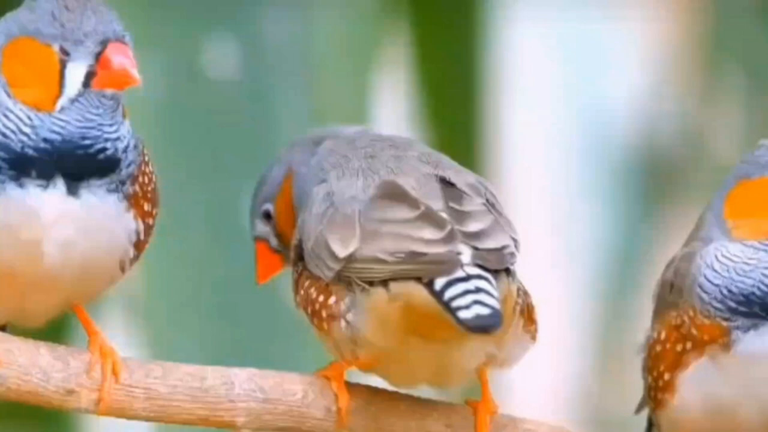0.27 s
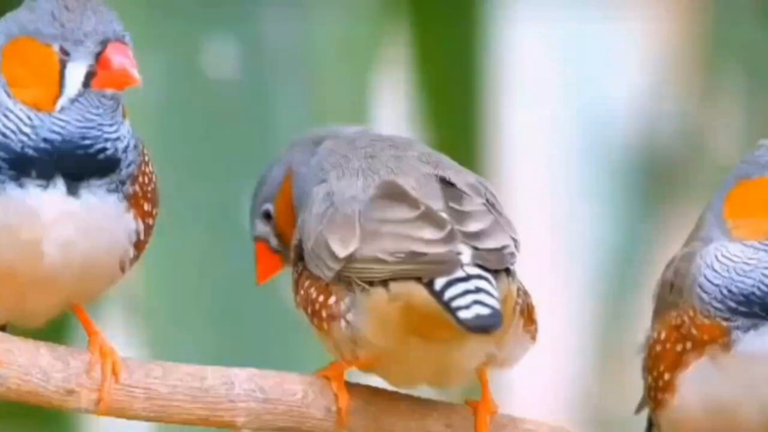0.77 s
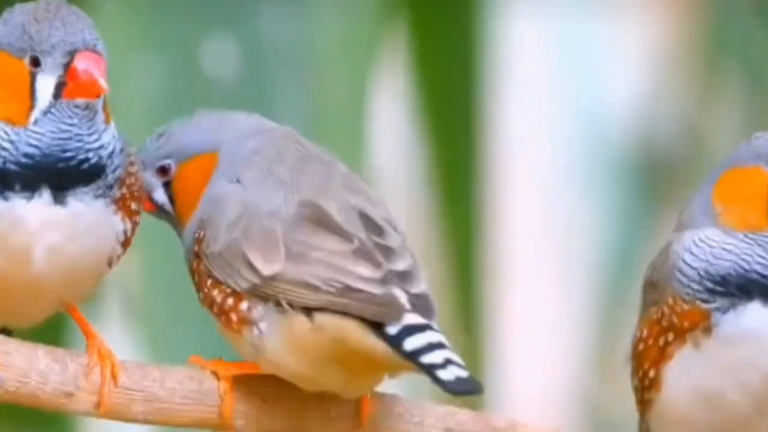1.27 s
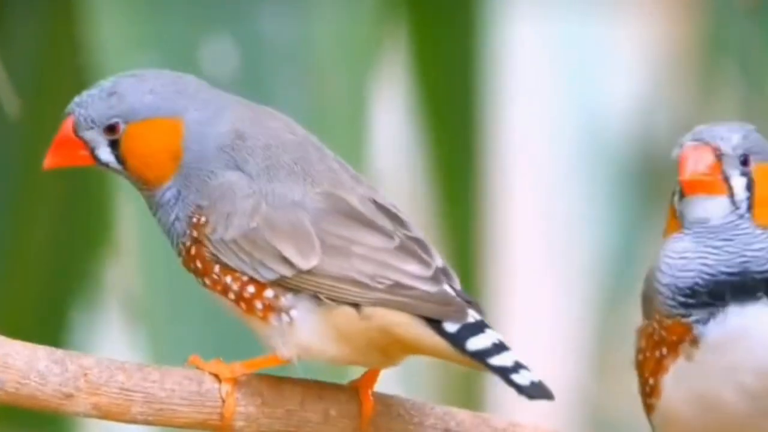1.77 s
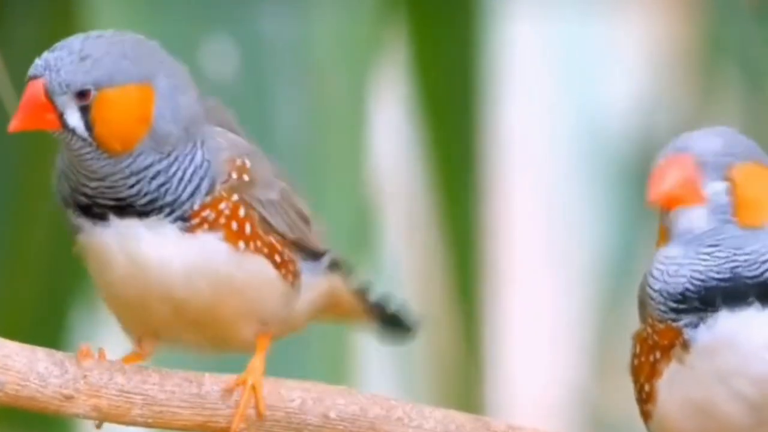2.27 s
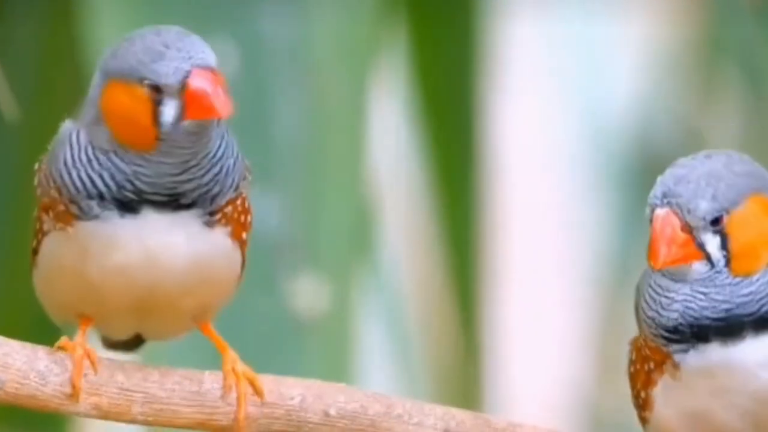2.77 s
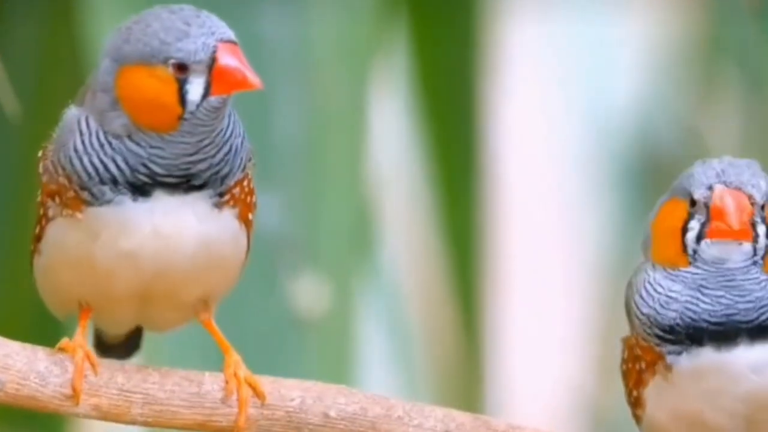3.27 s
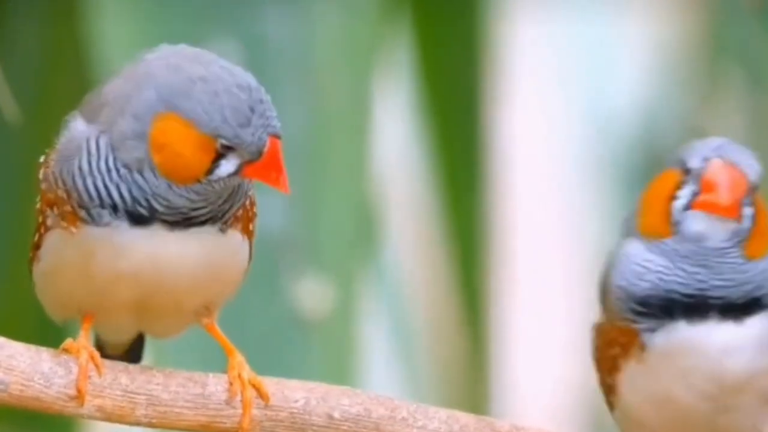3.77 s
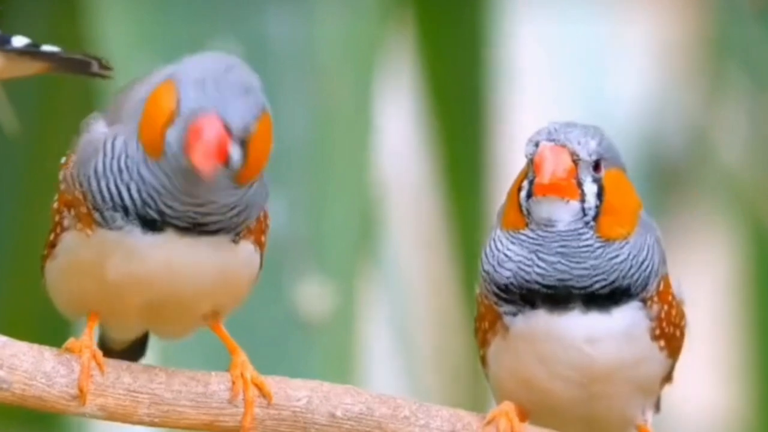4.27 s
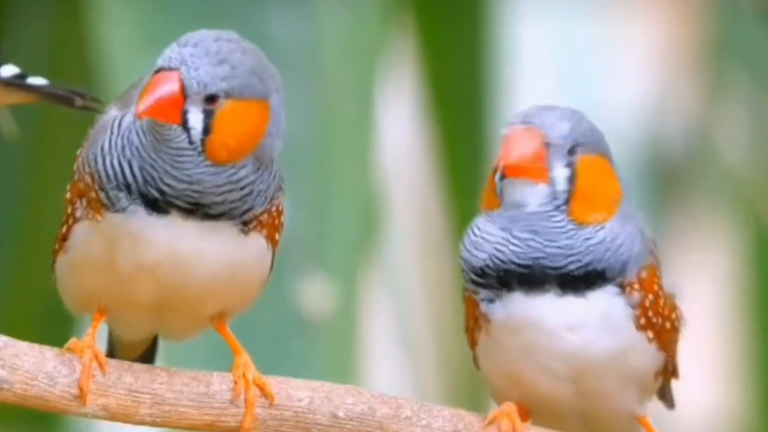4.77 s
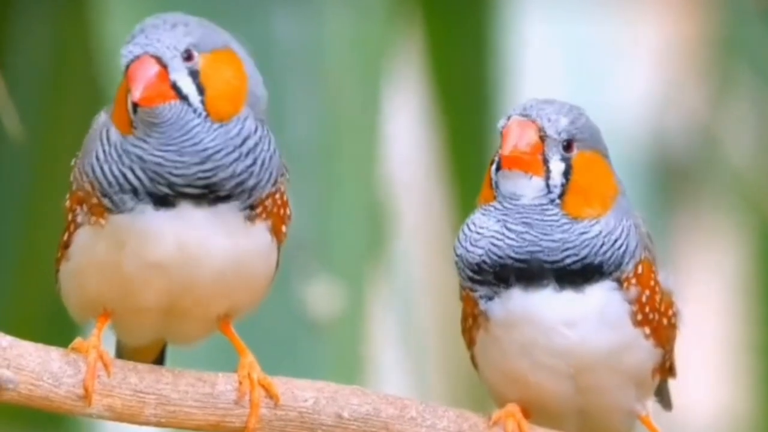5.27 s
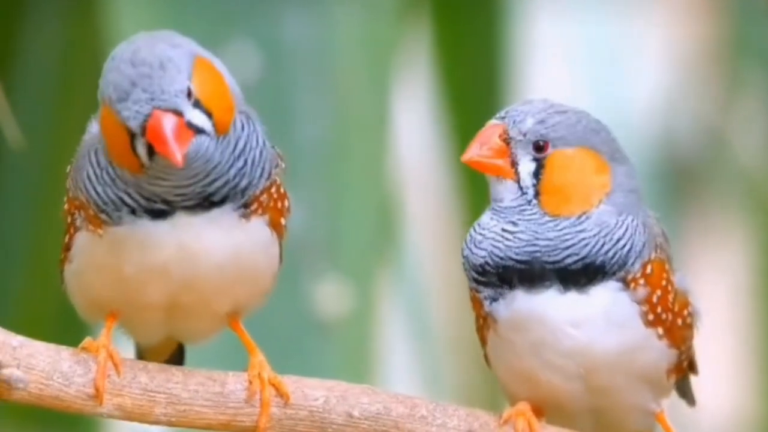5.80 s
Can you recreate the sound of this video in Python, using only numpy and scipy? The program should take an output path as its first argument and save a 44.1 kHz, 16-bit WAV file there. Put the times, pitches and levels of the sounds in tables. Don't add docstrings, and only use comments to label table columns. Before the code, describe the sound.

A close pickup in a small-finch aviary, with faint hiss, low machine hum, a thin high insect tone and barely audible distant chirps. The first second is nearly quiet. Short nasal, buzzy beeps, each under a tenth of a second, then come at about 1.3, 1.8, 2.4, 2.7, 3.3, 3.9, 4.7, 4.9, 5.4, 5.7 and very softly 5.9 seconds, from near birds with slightly different voices. A faint whistle sounds at 1.3 and a blurred moan at 2.2. Wings flutter with crisp snaps around 2.4 to 2.5, feathers and claws rustle until 3.2, and a short duller thump of movement lands at 4.1. Farther birds give a hoarse rasp and level drawl from 3.2 to 3.8, a falling whine at 4.2, then soft pleading notes rising into a loud wavering squeal and warble from 4.6 to 4.9. Faint piping and shaken notes follow around 5.3 to 5.6, with light echo.

```python
import sys
import numpy as np
from scipy import signal
from scipy.fft import rfft, irfft
from scipy.io import wavfile
from scipy.ndimage import uniform_filter1d

SR = 44100
rng = np.random.default_rng(int(sys.argv[2]) if len(sys.argv) > 2 else 0)


def ratio(d):
    e = np.asarray(d, float) / 20
    return 10 ** e


def unload_audio(sound):
    columns = np.transpose(np.atleast_2d(sound))
    steps = np.round(np.clip(columns, -1, 1) * 32767)
    wavfile.write(sys.argv[1], SR, steps.astype(np.int16))


N = 266275

# frequency in Hz, level in dB.
HISS_SPECTRUM = [(18, -59), (30, -5), (69, -10.5), (182, -8.5), (308, -11), (370, -12.5), (1520, -21.5),
                 (1920, -25.5), (7490, -26.5), (8990, -47), (15600, -28)]
HISS_DB = -69
# frequency in Hz, level in dB, width in Hz.
HUM_LINES = [(34.6, -9.5, 23), (68.4, -8, 24), (94, -4.5, 22), (186.2, -5, 18), (338, -24, 5.9)]
HUM_DB, RUMBLE_DB = -78, -76
# centre in seconds, level in dB, spread in seconds.
HUM_SWELLS = [(.8, -73.5, 0.14), (1.75, -73, 0.27), (3.04, -77, 0.14), (3.55, -70, 0.046),
              (3.85, -74, 0.14), (4.42, -68, 0.035)]
# centre in seconds, level in dB, spread in seconds.
HUM_SURGES = [(.65, -67, 0.054), (5.78, -60, 0.036), (5.94, -60, 0.027)]
# frequency in Hz, level in dB, width in Hz, throbs per second.
INSECT = (7550, -76, 280., 8.6)
# frequency in Hz, t60 in seconds.
AVIARY_T60 = [(1000, 0.17), (2600, 0.24), (7000, 0.069), (15000, 0.27)]
CHATTER_COUNT, CHATTER_MAX_DB = 150, -76
# start in seconds, #
# frequency in Hz, level in dB, width in Hz, length in seconds.
FAINT_TONES = [(0.49, 1238, -68, 80., 0.064), (0.501, 1830, -73, 100., 0.037), (0.595, 751, -70, 80., 0.08),
               (1.3, 2300, -52, 70., 0.11), (1.33, 2290, -60, 50., 0.14), (1.33, 2850, -62, 120., 0.08),
               (1.33, 3450, -63, 120., 0.07), (1.32, 511, -72, 60., 0.11), (1.4, 1136, -69, 100., 0.16),
               (1.713, 4720, -68, 300., 0.05), (1.88, 3200, -62, 900., 0.08), (1.93, 3600, -65, 900., 0.11),
               (2.325, 4820, -68, 150., 0.11), (2.55, 500, -75, 60., 0.073),
               (2.865, 1150, -64, 200., 0.025), (2.99, 700, -69, 150., 0.06),
               (3.025, 2740, -64, 90., 0.045), (3.065, 680, -67, 150., 0.075),
               (3.497, 525, -65, 80., 0.049), (3.77, 1930, -66, 500., 0.16), (3.78, 3060, -66, 650., 0.15),
               (3.77, 4430, -68, 550., 0.16), (4.116, 1195, -58, 80., 0.046),
               (4.306, 3620, -56, 60., 0.025), (4.32, 1990, -63, 100., 0.085),
               (4.35, 3150, -57, 1000., 0.14), (4.381, 1370, -70, 80., 0.096),
               (5.51, 1450, -69, 60., 0.038), (3.46, 7400, -62, 350., 0.18), (3.69, 5300, -69, 100., 0.11),
               (4.785, 5920, -58, 90., 0.055), (5.77, 2400, -58, 100., 0.11), (5.77, 2920, -58, 100., 0.09),
               (5.16, 3450, -71, 150., 0.12), (5.42, 4650, -65, 150., 0.09), (5.54, 5150, -70, 150., 0.055),
               (2.54, 1900, -70, 400., 0.16), (5.947, 705, -66, 60., 0.13)]

# time in seconds, peak in dB, t60 in seconds, dullness 0-1, first snap in dB.
RUSTLES = [(1.723, -56.5, 0.2, 0.05, 10), (1.805, -49, 0.48, 0.67, -6), (2.079, -54.5, 0.58, 0, 5),
           (2.3914, -47.5, 0.48, 0, -29), (2.4164, -40, 0.14, 0.65, 6.5), (2.428, -36.5, 0.2, 0.8, -6),
           (2.456, -40.5, 0.29, 0, -35.5), (2.485, -54.5, 0.061, 0, 30.5), (2.5002, -36, 0.059, 0, 4),
           (2.695, -53.5, 0.48, 0, 3), (2.7222, -47.5, 0.58, 1, -19), (2.8687, -47, 0.45, 0.5, 5),
           (2.8845, -50.5, 0.19, 0.6, -1), (2.9047, -47.5, 0.317, 0.2, 3), (2.9447, -46, 0.19, 0.05, 2),
           (2.972, -49.5, 0.17, 0, 6), (2.988, -43.5, 0.23, 0, -5), (3.0165, -57.5, 0.14, 0, 0.5),
           (3.033, -54, 0.17, 0, -1), (3.0736, -53.5, 0.34, 0, -10), (3.109, -57.5, 0.095, 0, 15.5),
           (3.156, -47.5, 0.39, 0.35, -27), (3.19, -34, 0.079, 0.37, -18), (4.1215, -33.5, 0.13, 0.46, -15),
           (4.136, -28, 0.085, 0.66, -42)]
# time in seconds, peak in dB.
SNAPS = [(2.4294, -34.5), (2.4829, -33.5), (2.6949, -57), (2.904, -45.5), (2.9442, -53), (2.9728, -39.5),
         (3.0167, -44), (3.0756, -43), (3.1549, -46), (3.1908, -44.5)]
# frequency in Hz, level in dB.
FEATHERS = [(350, -22), (600, -21.5), (1500, -8.5), (2400, -10), (4200, -11), (5700, -9), (7800, -9),
            (9300, -3.5), (12000, -4), (15500, -5)]
# frequency in Hz, level in dB.
FEET = [(350, -54.5), (600, -66.5), (1190, -12.5), (1870, -6.5), (4180, 2), (6230, -9.5), (8000, -41),
        (10400, -36.5), (17600, -120)]
STIR_DB = -73.5
# centre
# in seconds, level in dB, spread in seconds.
STIR_BOUTS = [(1.5, -74, 0.173), (2.55, -73, 0.058), (3.0, -70, 0.06), (3.5, -72.5, 0.099),
              (4.0, -81, 0.71), (4.83, -63, 0.1)]

# start in seconds, length in seconds, first and last pitch in Hz, peak in dB.
PEEPS = [(2.135, 0.094, 1836, 1945, -61), (2.33, 0.11, 2240, 2130, -61), (5.26, 0.16, 2485, 2510, -67.5),
         (5.8, 0.15, 4900, 4960, -67), (5.8, 0.23, 3950, 3990, -69.5)]
CHURRS = [(3.2, 0.114, 2876, 2650, -61.5)]
RATTLES = [(5.48, 0.108, 2950, 3300, -57.5), (5.44, 0.16, 2450, 2800, -68.5),
           (5.44, 0.13, 3800, 3500, -67.5), (5.43, 0.09, 2750, 2200, -68)]
# loudest place 0-1, loss at start and at end in dB, partials (multiple, level in dB),
# blur in Hz, breath in dB.
PEEP = (0.31, 33, 12, [(1, -3.5)], 150, -37)
CHURR = (0.15, 2.2, 5.8, [(0.996, 3.5), (0.78, 0), (0.81, -0.5)], 187, -0.5)
RATTLE = (0.89, 8.8, 2.9, [(1, 2), (1.1, -9.5)], 350, -18.5)
RATTLE_HZ, RATTLE_DEPTH = 68, 0.3

# frequency in Hz, level in dB.
BREATH = [(900, -25.5), (1800, -13.5), (2800, 1), (4500, 1), (6500, -6.5), (8000, -11), (11000, -19.5)]
# time in seconds, strongest partial in Hz, its level in dB.
RASP = [(3.23, 3620, -60), (3.3, 3600, -59.5), (3.37, 3690, -54), (3.602, 3668, -54), (3.73, 3840, -75)]
DRAWL = [(3.42, 2598, -55), (3.46, 2604, -48.5), (3.5, 2619, -48), (3.56, 2567, -50.5), (3.65, 2590, -56.5),
         (3.752, 2600, -66.5), (3.79, 2580, -79)]
WHINE = [(4.15, 2524, -55), (4.18, 2370, -60), (4.23, 2265, -59), (4.31, 2168, -75.5), (4.36, 2360, -58)]
PLEA = [(4.36, 2273, -74), (4.44, 2383, -56.5), (4.478, 2380, -57.5), (4.55, 2376, -61), (4.6, 2306, -57),
        (4.625, 2246, -63), (4.65, 2170, -75)]
SQUEAL = [(4.61, 2187, -39), (4.625, 2307, -48.5), (4.645, 2476, -42), (4.7, 2512, -49.5),
          (4.76, 2518, -56.5), (4.79, 2445, -40), (4.86, 2399, -42.5), (4.906, 2327, -53),
          (4.925, 2350, -47)]
MOAN = [(2.15, 2620, -68), (2.18, 2790, -63.5), (2.22, 2856, -64.5), (2.26, 2870, -75), (2.295, 2914, -60),
        (2.36, 2757, -67), (2.43, 2620, -63)]
PIPING = [(5.17, 3720, -90), (5.21, 3910, -75.5), (5.252, 3900, -58.5), (5.295, 3870, -72),
          (5.33, 3570, -70), (5.36, 3350, -60)]
WARBLE = [(4.645, 3000, -61.5), (4.66, 3065, -46.5), (4.692, 3012, -33.5), (4.705, 3160, -43),
          (4.718, 3110, -35), (4.795, 3007, -36), (4.83, 2940, -46.5), (4.87, 2882, -50)]
REPLY = [(4.39, 3450, -66), (4.43, 3580, -55), (4.5, 3618, -56), (4.58, 3570, -56.5), (4.63, 3560, -68.5),
         (4.72, 3560, -68)]
WARBLE_END = [(4.8, 2520, -62), (4.83, 2297, -58.5), (4.85, 2155, -46.5), (4.872, 2042, -52.5),
              (4.93, 2024, -55)]
# contour, partials (multiple, level in dB), blur in Hz, breath in dB.
LONG_CALLS = [
    (RASP, [(1, 3), (.5, -22), (2, -12), (1.5, -11), (1.2, -12), (.84, -13)], 150, -2),
    (DRAWL, [(1, 0), (2, -12)], 95, -7),
    (WHINE, [(1, 6), (2, -6), (1.25, -2.5)], 123, -7),
    (PLEA, [(1, 2.5), (.5, -23), (2, 2), (2.5, -11)], 138, -15),
    (REPLY, [(1, -2.5)], 170, -22),
    (SQUEAL, [(1, 2), (2, -2), (3, -11.5), (4, -14.5), (5, -22.5), (.92, -10), (2.8, -16.5)], 136, -31),
    (WARBLE, [(1, -1), (2, -24.5), (3, -30)], 116, -21),
    (WARBLE_END, [(1, 6.5), (1.5, -28)], 82, -14),
    (PIPING, [(1, 0.5)], 70, -23),
    (MOAN, [(1, 0.5), (1.5, -17)], 320, -13.5),
]

# frequency in Hz, level in dB.
THROAT = [(530, -53.5), (900, -40.5), (1200, -16.5), (1630, -20), (2310, -11), (2930, -8), (3460, -3.5),
          (4180, -1), (4820, -2.5), (5440, -9.5), (5840, -14), (7770, -42), (8750, -29), (12200, -37),
          (15500, -35)]
# frequency in Hz, depth 0-1, width in Hz.
THROAT_DIPS = [(2936, 0.76, 21), (4775, 1, 38), (5290, 0.52, 110)]
BEAK_HZ, BEAK_WIDTH_HZ = 4650, 1200
FRAY_HZ = 230
# start in seconds, length in seconds, peak in dB, mid-call sag of effort
# in dB, beak towards the microphone in dB.
NEAR_CALLS = [(2.725, 0.077, -31, -7, -4.5), (3.302, 0.086, -27, -3.5, -4), (3.902, 0.094, -27.5, 0, 1),
              (4.902, 0.0828, -28.5, -2.5, -10), (5.683, 0.087, -30.5, -4.5, -1)]
NEAR_TINTS = [
    [0.2, 1, -2, -0.83, .1, .1, .1],
    [-1.8, 1.2, -2.5, -0.5, .1, .1, .1],
    [-0.3, -2.8, 1.1, 0.7, .1, .1, .1],
    [-1.5, 2.5, -2.1, -3, .1, .1, .1],
    [-2.1, -0.5, 1.5, -2.5, .1, .1, .1],
]
NEAR_HZ, NEAR_HZ_PER_DB = 592.7, 0.5
NEAR_BEND = .11
SAG_PLACE, PUSH_PLACE, PUSH_SHARE = 0.39, 0.58, 0.51
# start in seconds, peak in dB, top pitch in Hz, share of pitch lost at the ends,
# beak towards the microphone in dB.
BRISK_CALLS = [(1.276, -33.5, 576.4, 0.15, -3.5)]
FAR_CALLS = [(1.03, -65, 541.4, 0.068, 0.092)]
DULL_CALLS = [(1.822, -38.5, 546, .22, .1)]
DEEP_CALLS = [(2.413, -34, 560, .26, .1)]
BRIGHT_CALLS = [(4.737, -33.5, 562.3, 0.2, 0.45)]
SHY_CALLS = [(5.946, -42.5, 551.2, 0.08, 4.9)]
CLEAR_CALLS = [(5.356, -39, 547.7, 0.15, 0.34)]
BRISK_S, FAR_S, DULL_S, DEEP_S, BRIGHT_S, SHY_S = 0.066, 0.061, 0.068, 0.075, .071, 0.067
# effort (place 0-1, level in dB), harmonics 2, 3, .. in dB, place of the top pitch 0-1,
# hoarse share 0-1, last fall against first rise, echo in dB.
NEAR_VOICE = ([(0, -20), (.07, -16.5), (.15, -3.5), (.74, 1.62), (.85, 1), (1, -16)],
              [-15, -21, -5.5, -4.5, 0, 2.5, -7.5, -10, -30.5, -29], 0.428, 0.43, 0.808, -1.46)
BRISK_VOICE = ([(0, -38), (.17, -13), (.36, -8), (.5, -10), (.64, 3), (.78, -6.5), (1, -31)],
               [-11, -16.5, -4, -11.5, -5, -4, -14.5, -17, -30, -29], 0.5, 0.6, 1.2, -2)
FAR_VOICE = ([(0, -23), (.18, 4), (.69, 7.5), (1, -46)], [-4, -7, 2, 12, 4, -6, -34, -36, -40, -36],
             0.58, 0.91, 1.1, -2)
DULL_VOICE = ([(0, -28), (.14, -7.5), (.45, 1.5), (.72, -1.5), (.86, -7), (1, -30)],
              [-8.5, -13.5, -5, 0.5, -2.5, -2, -19.5, -23, -17, -27], .54, 0.4, 0.92, -6)
DEEP_VOICE = ([(0, -22), (.18, -8), (.62, 1), (.82, -3), (1, -22)],
              [-10, -8, -4, 3, -3, -5, -10, -24, -24, -26], .56, .7, 1.05, -6.5)
BRIGHT_VOICE = ([(0, -18), (.22, -2), (.58, 1.5), (.8, -3.5), (1, -20)],
                [-18, -19.5, -18, -3.5, -6, -4.5, -7.5, -26, -19, -22], 0.458, 0.73, 1.2, -4)
SHY_VOICE = ([(0, -20), (.21, -2), (.57, 2.5), (.81, -6), (1, -24)],
             [-21.5, -19, -12, -2.5, -7, -3.5, -13, -22, -9.5, -18.5], 0.44, 0.69, 0.68, -1.5)
CLEAR_VOICE = ([(0, -20), (.2, -4), (.56, 2), (.82, -4.5), (1, -17)],
               [-17.5, -16.5, -14, -2.5, -5.5, -7, -6, -25, -14, -18], 0.523, 0.83, 0.85, -1)


def evened(x):
    return x / np.sqrt(np.mean(abs(x) ** 2) + 1e-20)


def read(points, hz):
    f, value = np.transpose(points)
    return np.interp(np.log(hz + 1), np.log(f + 1), value)


def add(mix, start_s, sound):
    part = mix[round(start_s * SR):][:len(sound)]
    part += sound[:len(part)]


def coloured(points, size=N):
    hz = np.fft.rfftfreq(size, 1 / SR)
    spectrum = rfft(rng.standard_normal(size))
    return evened(irfft(spectrum * ratio(read(points, hz)), size))


def wobble(width_hz, size=N):
    pole = np.exp(-np.pi * 1.5 * width_hz / SR)
    z = rng.standard_normal((size + 4000, 2)) @ [1, 1j]
    return evened(signal.lfilter([1], np.poly([pole] * 3), z)[4000:])


def blurred_tone(hz, width_hz, size=N):
    t = np.arange(size) / SR
    return (wobble(width_hz, size) * np.exp(2j * np.pi * hz * t)).real


def unrolled(rows):
    s, *columns = np.transpose(rows)
    t = np.arange(s[0], s[-1], 1 / SR)
    return s[0], [uniform_filter1d(np.interp(t, s, c), 200, mode="nearest") for c in columns]


def bouts(rest_db, rows):
    t = np.arange(N) / SR
    bells = [ratio(db) * np.exp(-.5 * ((t - s) / spread_s) ** 2) for s, db, spread_s in rows]
    return ratio(rest_db) + sum(bells)


def arch(u, place, lost_start, lost_end):
    rise = lost_start * (1 - u / place) ** 2
    fall = lost_end * ((u - place) / (1 - place)) ** 2
    return np.where(u < place, rise, fall)


def hiss():
    hz, _, z = signal.stft(coloured(HISS_SPECTRUM), SR, nperseg=1024)
    patches = uniform_filter1d(rng.standard_normal(z.shape), 3, 0)
    patches = evened(uniform_filter1d(patches, 5, 1))
    patchy_db = np.interp(hz, [0, 1500, 8000], [3., 2.5, 1.5])[:, None] * patches
    noise = signal.istft(z * ratio(patchy_db), SR, nperseg=1024)[1][:N]
    return ratio(HISS_DB - 4.0) * evened(noise)


def hum():
    swell, surge = bouts(HUM_DB, HUM_SWELLS), bouts(-120, HUM_SURGES)
    out = np.zeros(N)
    for hz, db, width_hz in HUM_LINES:
        level = ratio(RUMBLE_DB)
        if hz > 80:
            level = swell + (hz > 150) * surge
        out += level * ratio(db) * blurred_tone(hz, width_hz)
    return out


def insect():
    hz, db, width_hz, throb_hz = INSECT
    t = np.arange(N) / SR
    throb = np.sin(2 * np.pi * throb_hz * t + 1.3 * wobble(2.5).real)
    throb = np.maximum(throb, .45) ** 2 * (.55 + .45 * abs(wobble(1.5)))
    return ratio(db) * throb * blurred_tone(hz, width_hz)


def aviary(x):
    taps = np.zeros(SR // 2)
    at = np.arange(400, len(taps) - 20, 20)
    taps[at + rng.integers(0, 20, len(at))] = rng.choice([-1., 1.], len(at))
    hz, t, z = signal.stft(taps, SR, nperseg=256)
    decay_db = -60 * t / read(AVIARY_T60, hz)[:, None]
    tail = signal.istft(z * ratio(decay_db), SR, nperseg=256)[1]
    return signal.fftconvolve(x, tail / np.linalg.norm(tail))[:N]


def faint(start_s, hz, db, width_hz, length_s):
    size = round(length_s * SR)
    return start_s, ratio(db) * np.hanning(size) * blurred_tone(hz, width_hz, size)


def chatter():
    out = np.zeros(N)
    for a, b, c, d in rng.random((CHATTER_COUNT, 4)):
        add(out, *faint(a * N / SR, 1500 + 7000 * b, CHATTER_MAX_DB - 6 * c, 90., .04 + .1 * d))
    return out


def rustles():
    bright, dull = coloured(FEATHERS), coloured(FEET)
    puffs, snaps, t = np.zeros(N), np.zeros(N), np.arange(12000) / SR
    for s, db, t60_s, dullness, snap_db in RUSTLES:
        at = round(s * SR)
        attack = np.sin(np.pi / 2 * np.minimum(t / .012, 1)) ** 2
        shape = ratio(db - 8 - 60 * t / t60_s) * attack
        shape = shape * (1 + ratio(snap_db - 60 * abs(t - .008) / 0.0044))
        add(puffs, s - .006, shape * (bright[at:at + len(t)] + dullness * dull[at:at + len(t)]))
    for s, db in SNAPS:
        add(snaps, s, ratio(db - 5 - 60 * t[:600] / .011) * bright[round(s * SR):][:600])
    grain = ratio(3. * wobble(150.).real - 1.)
    flicker = ratio(1.5 + 2.2 * wobble(40.).real)
    stir = bouts(STIR_DB, STIR_BOUTS) * flicker * coloured(FEATHERS)
    return snaps + grain * puffs + stir


def whistle(rows, partials, blur_hz, breath_db):
    s, (hz, db) = unrolled(rows)
    size = len(hz)
    turns = 2 * np.pi * np.cumsum(hz + .26 * blur_hz * wobble(250., size).real) / SR
    sound = ratio(breath_db + 2.5 * wobble(90., size).real) * coloured(BREATH, size)
    for multiple, partial_db in partials:
        steady = 0.68 * np.exp(-blur_hz * multiple / 650.0)
        fading = steady + 0.77 * wobble(blur_hz * multiple, size)
        sound = sound + ratio(partial_db) * np.sqrt(2) * (fading * np.exp(1j * multiple * turns)).real
    return s, ratio(db) * sound * signal.windows.tukey(size, .1)


def note(start_s, length_s, first_hz, last_hz, peak_db, place, start_db, end_db, *kind):
    u = np.linspace(0, 1, 12)
    db = peak_db - arch(u, place, start_db, end_db)
    hz = first_hz + (last_hz - first_hz) * u ** 2
    return whistle(np.c_[start_s + u * length_s, hz, db], *kind)


def rattle(row):
    s, sound = note(*row, *RATTLE)
    rate_hz = RATTLE_HZ * (1 + 0.23 * wobble(45.0, len(sound)).real)
    shake = 2 * np.pi * np.cumsum(rate_hz) / SR
    return s, sound * (1 + RATTLE_DEPTH * np.cos(shake))


def call(start_s, length_s, peak_db, top_hz, bend, turn_db, voice, sag_db=None, tint_db=0):
    effort, colour, place, hoarse, fall, echo_db = voice
    if sag_db is not None:
        effort = sorted(effort + [(SAG_PLACE, sag_db), (PUSH_PLACE, PUSH_SHARE * sag_db)])
    _, (effort_db,) = unrolled([(u * length_s, db) for u, db in effort])
    size = len(effort_db)
    u = np.linspace(0, 1, size)
    closing = u ** 6
    hz = top_hz * (1 - arch(u, place, bend, fall * bend))
    jitter = (0.0035 + 0.032 * closing) * wobble(233.0, size).real
    turns = 2 * np.pi * np.cumsum(hz * (1 + jitter)) / SR

    k = np.arange(1, 28)[:, None]
    set_k = slice(1, len(colour) + 1)
    voice_db = np.zeros(k.shape)
    voice_db[set_k, 0] = np.add(colour, tint_db) - read(THROAT, k[set_k, 0] * top_hz)
    beak_db = turn_db * np.exp(-((k * top_hz - BEAK_HZ) / BEAK_WIDTH_HZ) ** 2)
    gain = ratio(read(THROAT, k * hz) + voice_db + beak_db)
    for dip_hz, depth, width_hz in THROAT_DIPS:
        gain = gain * (1 - min(depth, .95) * np.exp(-((k * hz - dip_hz) / width_hz) ** 2))

    loose = np.clip((k - 8) / 5, .38 * hoarse, .95)
    chance = np.array([wobble(130.0 if one < 12 else FRAY_HZ, size) for one in k[:, 0]])
    waver = 1 - loose + loose * chance
    pulse = np.exp(1j * (k * turns + .72 * rng.standard_normal(k.shape)))
    stack = (gain * waver * pulse).real.sum(0) / np.sqrt((gain ** 2).sum(0) / 2)
    air = coloured(THROAT, size) * (1 + 1.3 * np.cos(turns))
    sound = stack + hoarse * ratio(-25.0 + 6.0 * closing) * air
    sound = ratio(effort_db + peak_db) * sound * signal.windows.tukey(size, .08)
    roughness = 1 - hoarse + 1.4 * hoarse * wobble(300., size).real
    return start_s, sound, ratio(echo_db - 6.5 * (1 - u)) * sound * roughness


def near_calls():
    calls = []
    for (s, length_s, db, sag_db, turn_db), tint in zip(NEAR_CALLS, NEAR_TINTS):
        top_hz = NEAR_HZ + NEAR_HZ_PER_DB * (db + 29)
        tint_db = tint + [0, 0, 0]
        calls.append(call(s, length_s, db, top_hz, NEAR_BEND, turn_db, NEAR_VOICE, sag_db, tint_db))
    return calls


def neighbour_calls():
    birds = [(BRISK_CALLS, BRISK_S, BRISK_VOICE), (FAR_CALLS, FAR_S, FAR_VOICE),
             (DULL_CALLS, DULL_S, DULL_VOICE), (DEEP_CALLS, DEEP_S, DEEP_VOICE),
             (BRIGHT_CALLS, BRIGHT_S, BRIGHT_VOICE), (SHY_CALLS, SHY_S, SHY_VOICE),
             (CLEAR_CALLS, BRIGHT_S, CLEAR_VOICE)]
    return [call(row[0], length_s, *row[1:], voice) for rows, length_s, voice in birds for row in rows]


def scene():
    direct, sideways, far = np.zeros((3, N))
    for row in FAINT_TONES:
        add(direct, *faint(*row))
    for rows, kind in [(PEEPS, PEEP), (CHURRS, CHURR)]:
        for row in rows:
            add(far, *note(*row, *kind))
    for row in RATTLES:
        add(direct, *rattle(row))
    for row in LONG_CALLS:
        add(far, *whistle(*row))
    for s, ahead, aside in near_calls() + neighbour_calls():
        add(direct, s, ahead)
        add(sideways, s, aside)
    echoes = aviary(sideways + ratio(-2.0) * far)
    background = hiss() + hum() + insect() + chatter()
    return (background + rustles() + far + echoes + direct)[None]


def top_cut(x):
    return signal.sosfilt(signal.butter(12, 15730, fs=SR, output="sos"), x)


def record(dry):
    lowpass = signal.firwin(511, 15750, window=("kaiser", 9), fs=SR)
    limited = signal.oaconvolve(dry, lowpass[None], "same")
    return top_cut(limited)


dry = scene()
out = record(dry)
unload_audio(out)
```